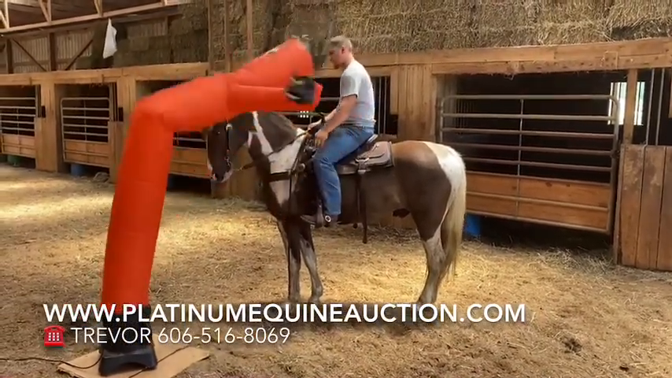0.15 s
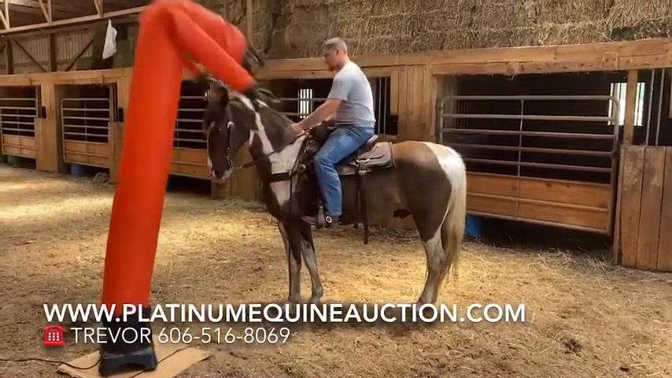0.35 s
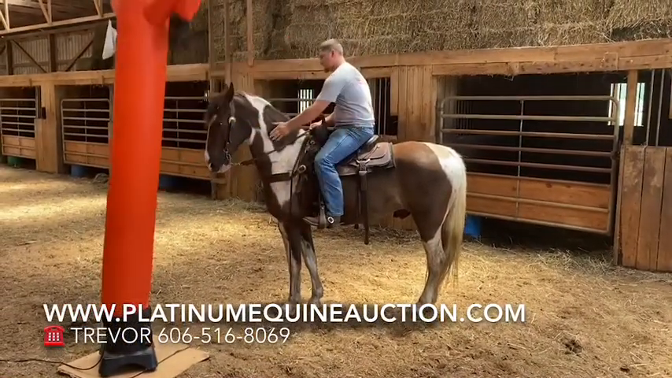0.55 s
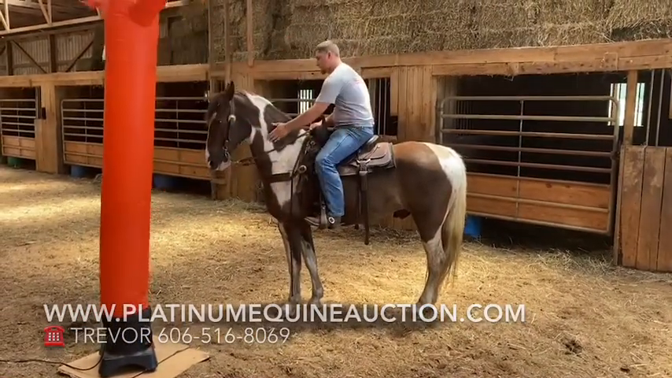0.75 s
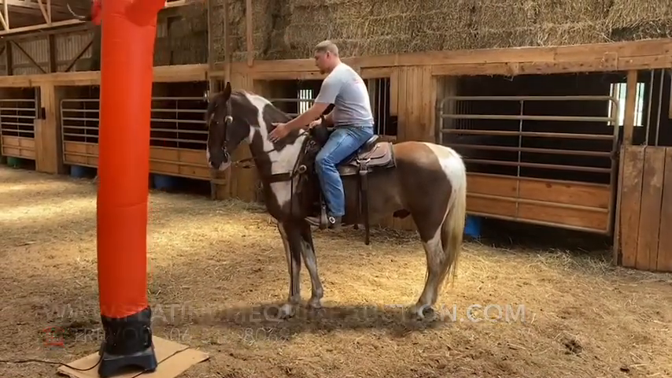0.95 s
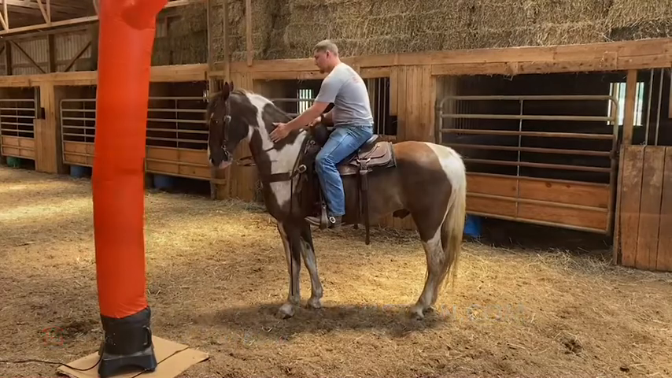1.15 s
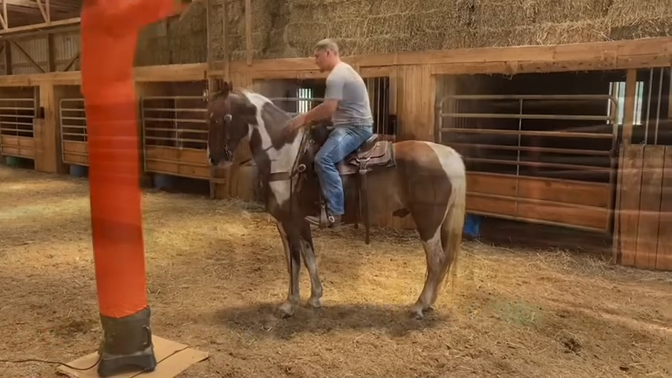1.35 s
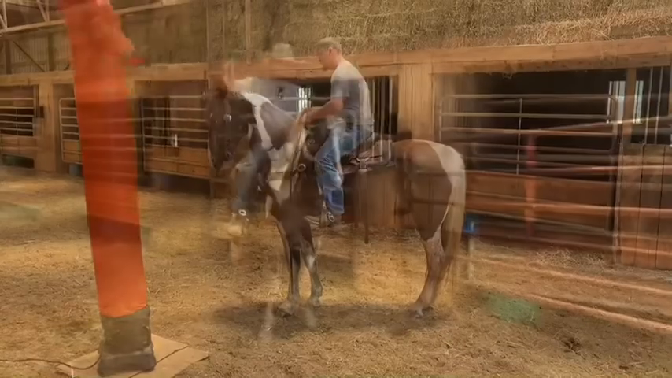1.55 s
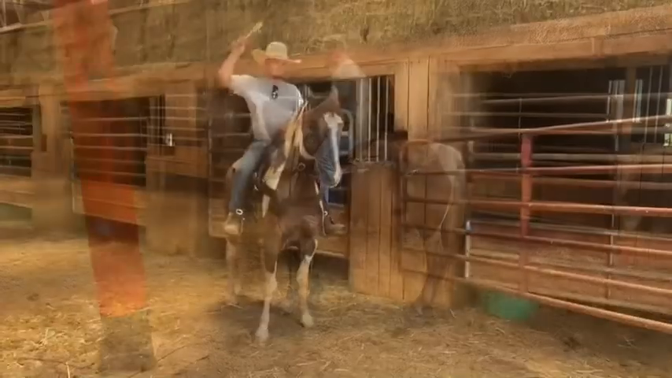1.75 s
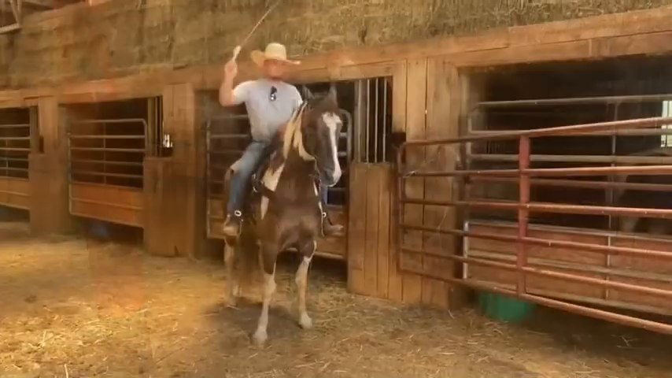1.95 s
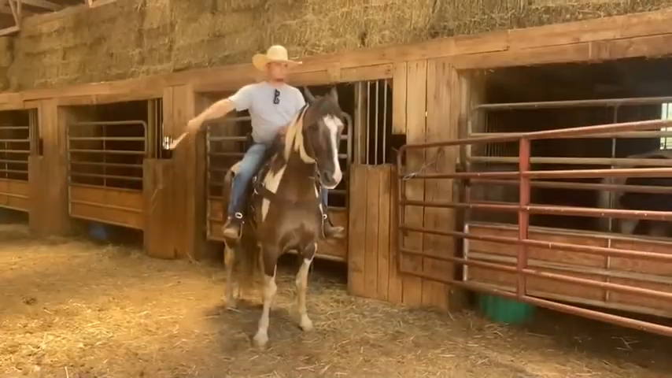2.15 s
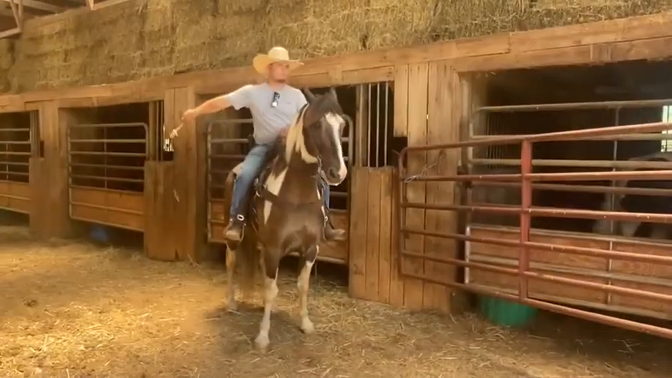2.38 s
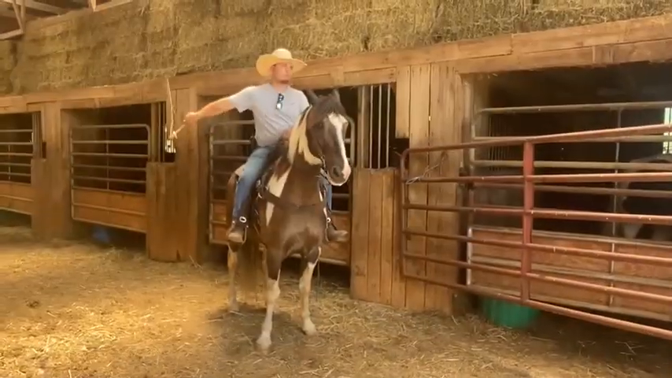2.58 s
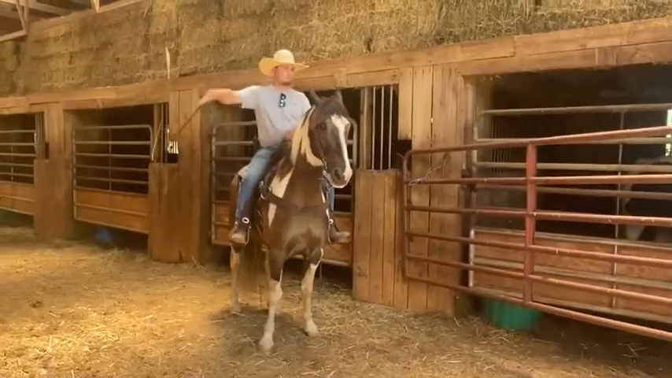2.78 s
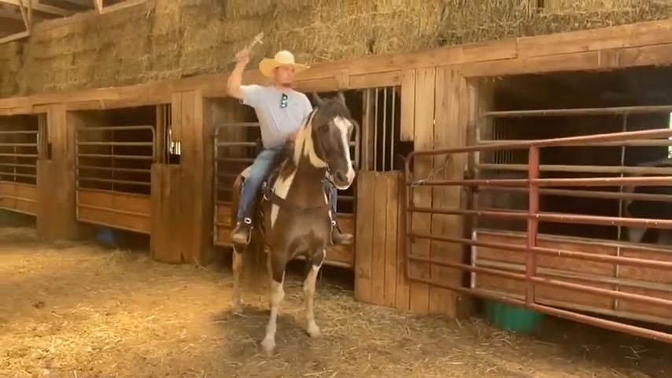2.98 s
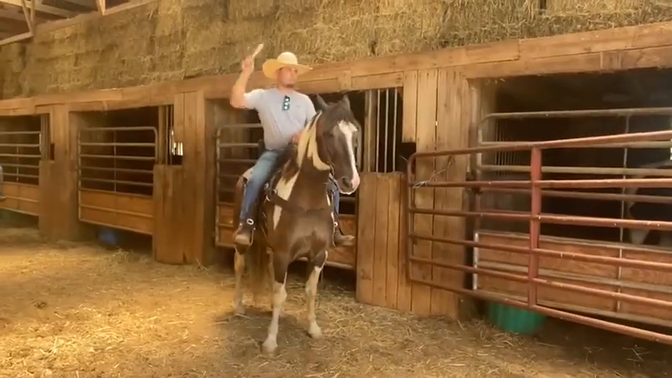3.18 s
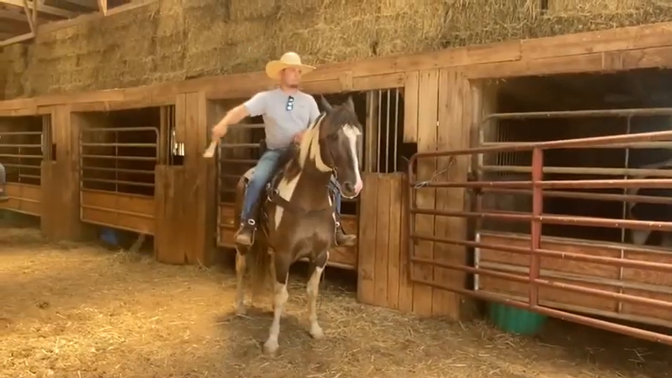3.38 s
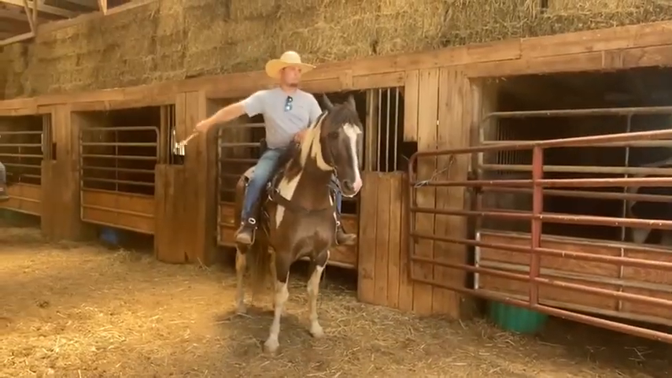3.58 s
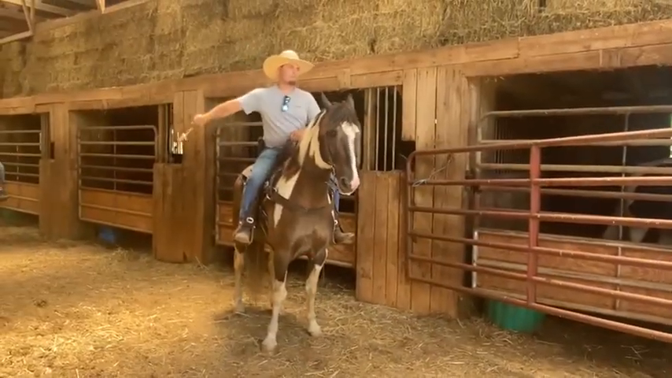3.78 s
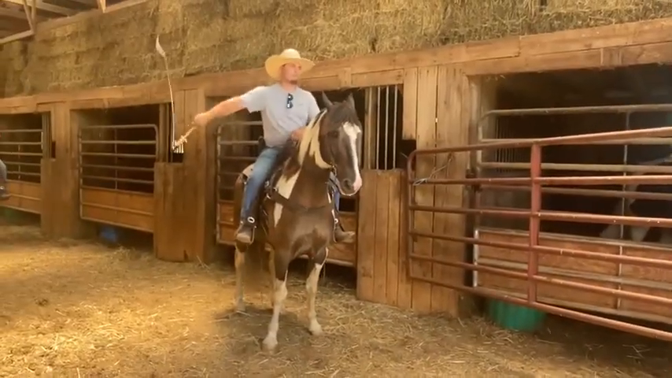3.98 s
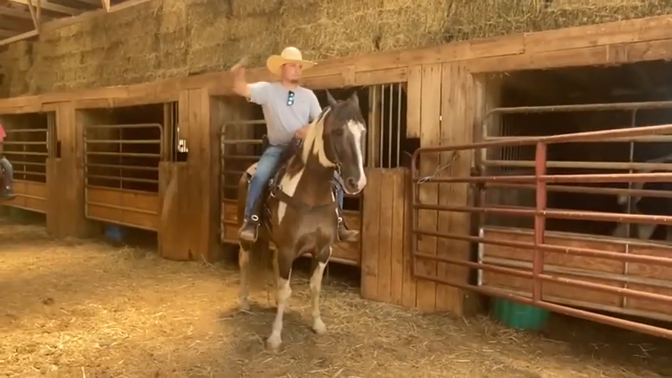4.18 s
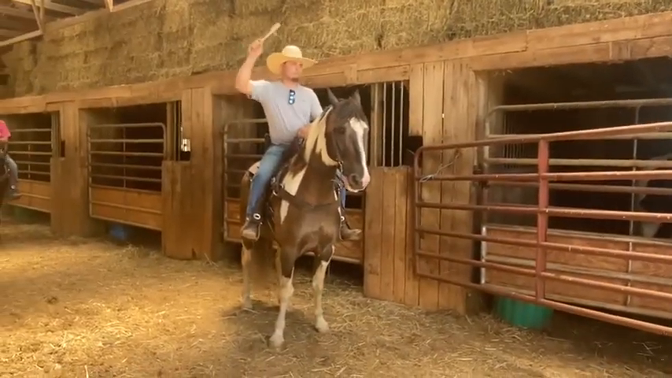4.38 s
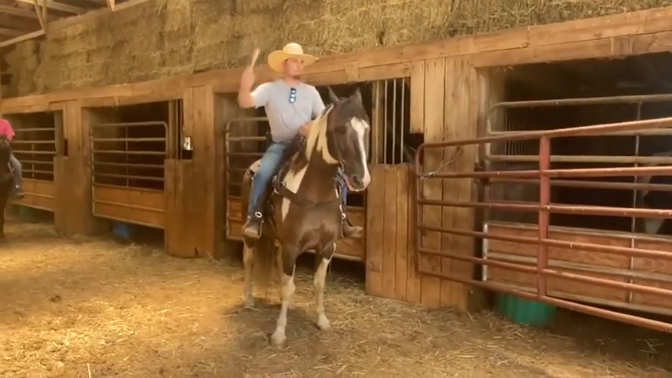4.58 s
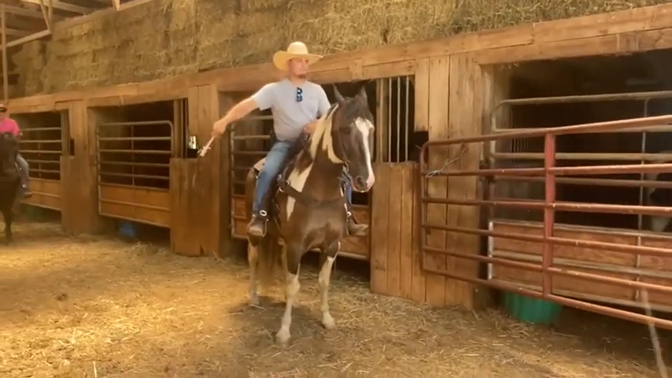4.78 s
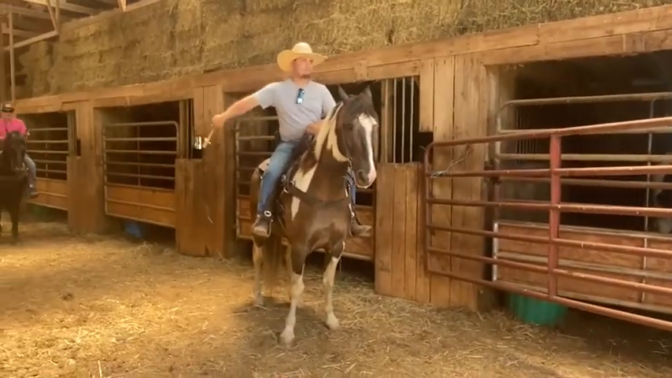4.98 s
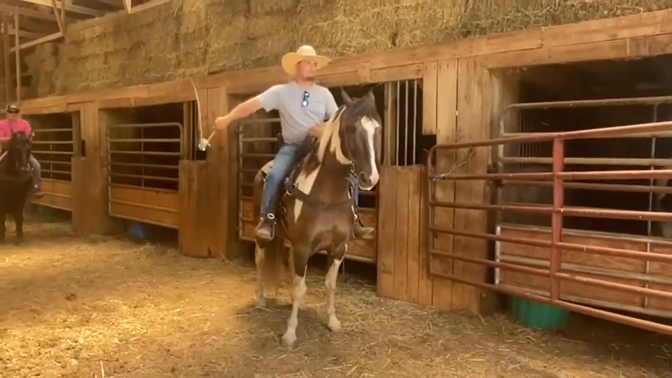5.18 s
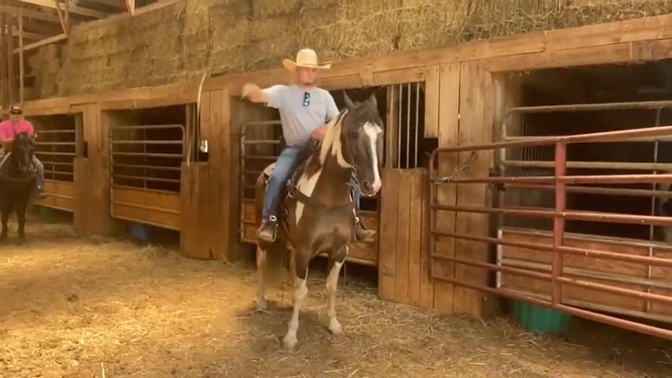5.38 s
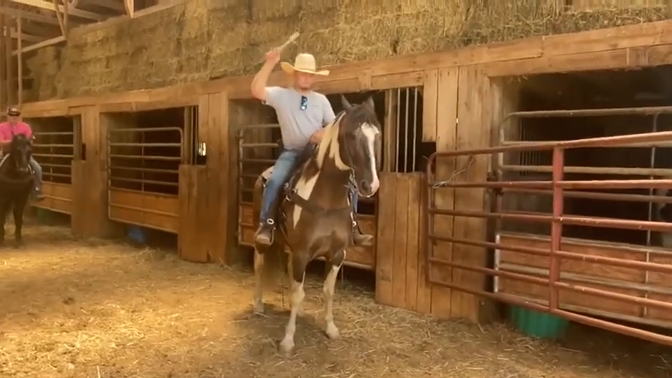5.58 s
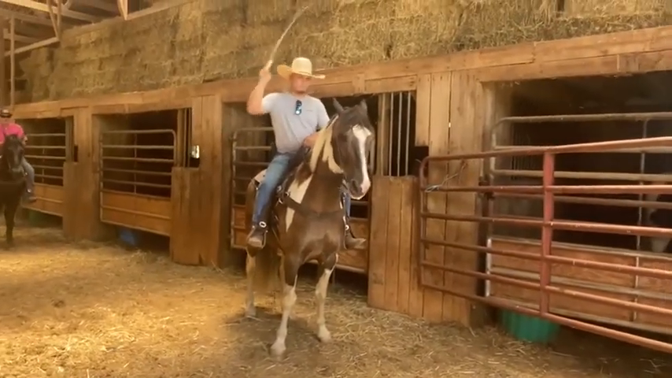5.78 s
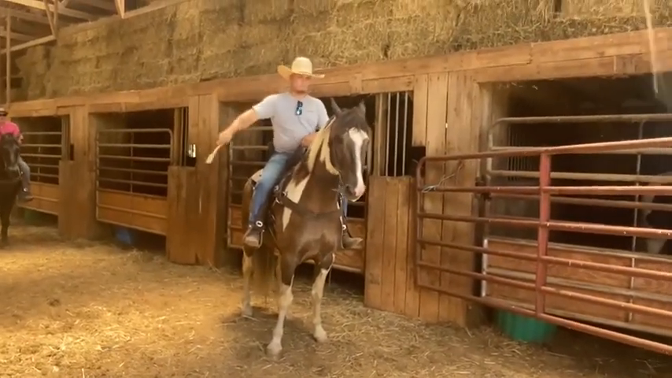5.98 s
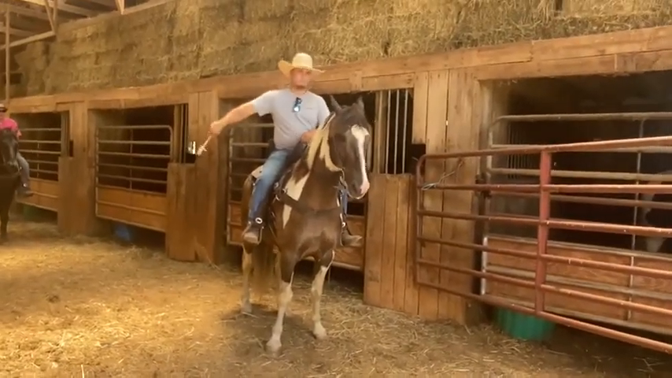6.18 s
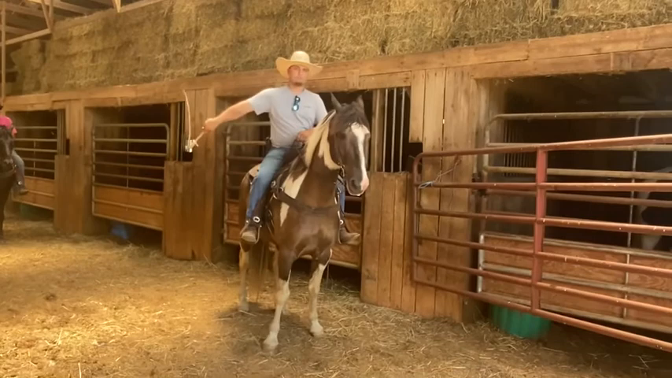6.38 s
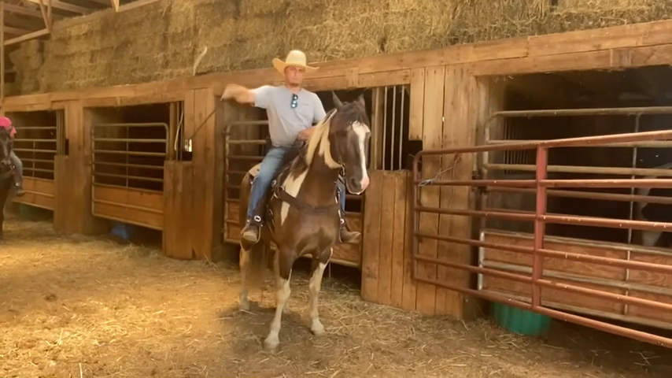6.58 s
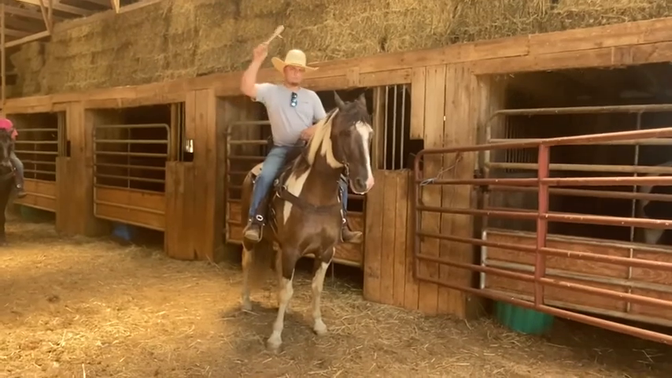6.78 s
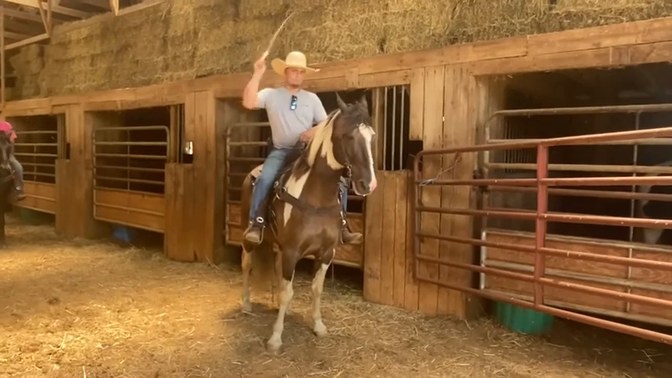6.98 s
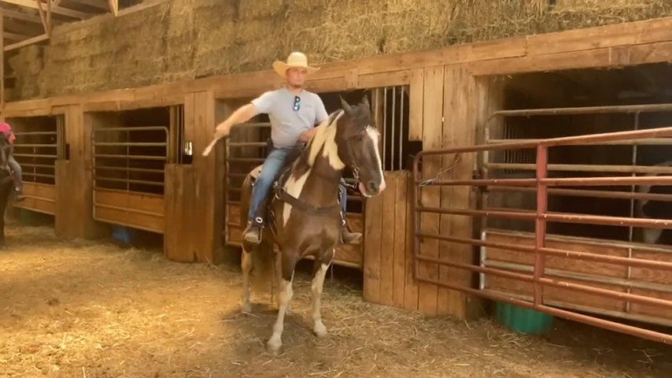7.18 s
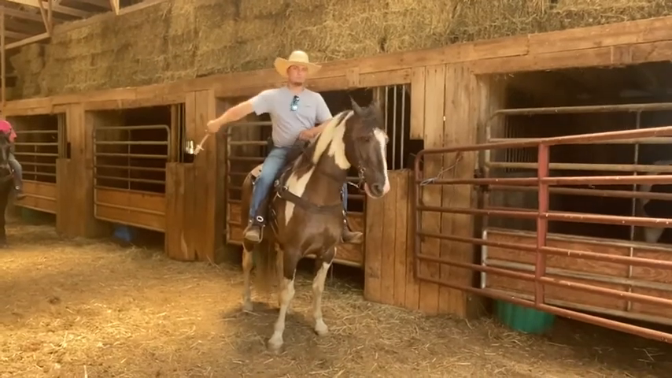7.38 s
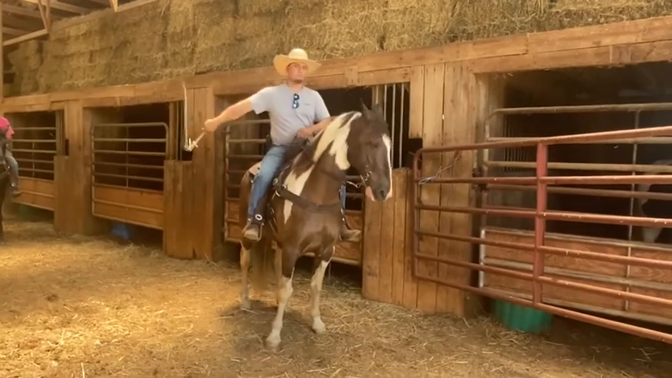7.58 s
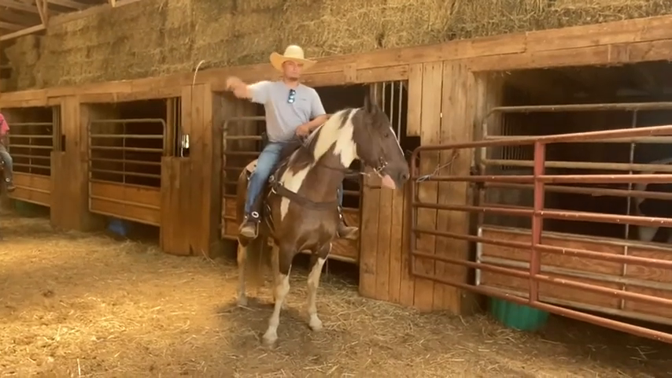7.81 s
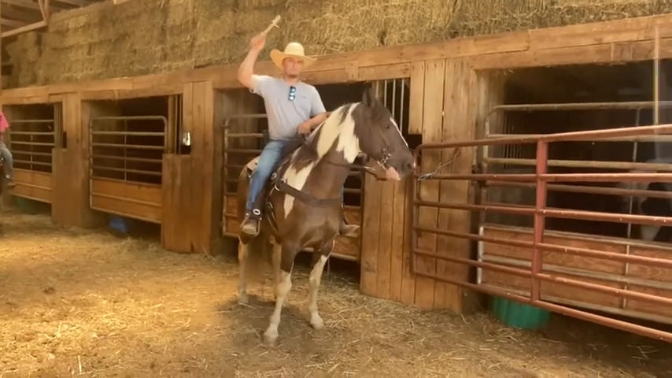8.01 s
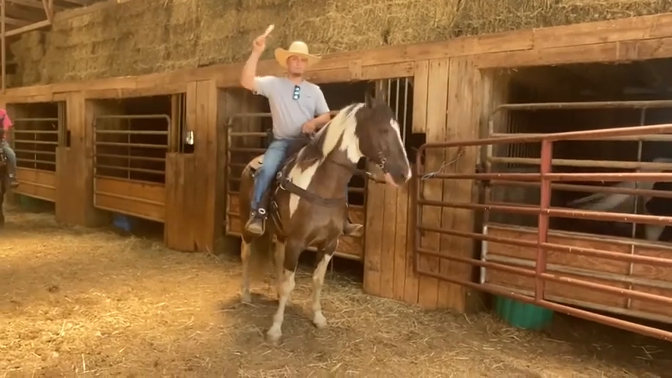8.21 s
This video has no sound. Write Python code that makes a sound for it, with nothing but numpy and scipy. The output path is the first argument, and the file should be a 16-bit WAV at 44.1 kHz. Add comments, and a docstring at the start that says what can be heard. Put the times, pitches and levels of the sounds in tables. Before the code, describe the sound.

A blower rushes through a flapping fabric tube and dies away, then five sharp whip cracks ring and slap back through a long timber barn.

```python
"""A long timber barn, heard by a microphone pair: a blower rushes through a flapping fabric tube and fades,
then a rider cracks a whip five times. Each crack is a shock wave with scattered grains of noise, returned by
floor, stalls and roof, then by the far end walls, over a dying wash of noise that decays band by band.
Between cracks the thong swishes in sliding bands of noise, sparrows chirp in gliding sines, tack ticks in
short resonant clicks, and a breeze rumbles and knocks on the microphone in low noise and soft pushes."""
import sys
import numpy as np
from scipy import signal
from scipy.fft import rfft, irfft, next_fast_len
from scipy.io import wavfile
from scipy.ndimage import map_coordinates

SR = 44100
rng = np.random.default_rng(int(sys.argv[2]) if len(sys.argv) > 2 else 0)


def put_to_file(sound):
    """Save the sound as 16-bit audio at rate SR, in the file named by the first command-line argument."""
    columns = np.atleast_2d(sound).T  # one column per channel
    safe = np.clip(columns, -1, 1)
    whole_steps = np.round(safe * 32767)
    wavfile.write(sys.argv[1], SR, whole_steps.astype(np.int16))


def invert_db(level):
    """Linear amplitude ratio for a level in decibels (20 dB per decade), elementwise."""
    return 10 ** (np.asarray(level, dtype=float) / 20)


N = 363825
T = np.arange(N) / SR   # seconds

# Blower running down. Each row: time in seconds, rush level in dB, tube boom in dB against the rush.
BLOWER_RUN = [(0.0, -22.5, -12), (0.29, -24, -3), (0.39, -22, -15.5), (1.0, -24, -12), (1.4, -27.5, -10),
              (1.7, -34, -14), (1.89, -42.5, -12.5), (1.99, -63.5, -6)]
# Tone of the rush as heard, the middle with narrow gaps near 9.2 and 13.1 kHz, then the sides.
# Each row: frequency in Hz, relative density in dB.
RUSH_MID_TONE = [(200, -8.5), (300, 1), (500, -7.5), (790, 1), (1300, -7), (1660, -8), (1740, -18),
                 (2000, -18.5), (2570, -20.5), (4000, -23.5), (6820, -25), (8400, -36.5), (9220, -49.5),
                 (10200, -34.5), (12300, -39), (13100, -73.5), (14100, -40), (16000, -51.5)]
RUSH_SIDE_TONE = [(24, -58.5), (40, -43), (392, -15), (444, -11.5), (790, -8), (1850, -14), (5440, -37),
                  (7170, -37), (8990, -33.5), (13400, -42), (16000, -87)]
# Resonances of the air column in the tube. Each row: frequency in Hz, width in Hz, added level in dB.
TUBE_MODES = [(215, 40, 9.5), (304.6, 28, -0.6), (389.3, 11, 4), (800, 190, -7.5), (1226, 160, -2.1),
              (2720, 840, 4.5)]
# Tone of the still barn air. Each row: frequency in Hz, relative density in dB.
AIR_TONE = [(180, -37.5), (300, 2), (584, -10.5), (1120, -8), (2360, -14.5), (3460, -8.5), (4440, -10),
            (5610, -18), (9390, -32.5), (12100, -27), (16000, -49.5)]
# Fabric snaps taut. Each row: time in seconds, peak in dB.
FABRIC_SNAPS = [(0.224, -14.5), (0.264, -25), (0.41, -33.5), (0.466, -28)]
# Whip cracks. Each row: time in seconds, shock level in dB, end-wall return level in dB, thud peak in dB,
# level in dB that the swish of the forward throw reaches.
WHIP_CRACKS = [(2.0774, -4.5, -2.5, -21, -52.5), (3.3668, -3, 2, -23, -56.5),
               (4.640, -1.5, 0.5, -24.5, -58.5), (5.8817, -0.5, 1.5, -17, -56.5),
               (7.0834, -2, 2, -26.5, -54)]
# The thong turns behind the rider. Each row: time in seconds, flick of the tip in dB, swish in dB.
THONG_TURNS = [(2.8344, -60, -56.5), (4.123, -67.5, -57), (5.3734, -63.5, -54), (6.5944, -61, -54),
               (7.8176, -62.5, -57)]
# Breeze on the microphone. Each row: time in seconds, rumble level in dB.
BREEZE_RUMBLE = [(1.95, -61), (2.34, -61.5), (2.65, -53), (2.97, -69), (3.25, -72.5), (3.44, -64.5),
                 (3.65, -63.5), (3.93, -73), (4.97, -60), (5.05, -59), (5.39, -63.5), (5.67, -66),
                 (5.97, -62), (6.2, -66.5), (6.76, -62), (7.83, -54), (8.0, -42), (8.25, -51.5)]
# Nearer sparrows, chirps that slide.
# Each row: start in seconds, length in seconds, first pitch in Hz, last pitch in Hz, level in dB.
SLIDING_CHIRPS = [(2.705, 0.023, 4616, 3600, -64), (3.23, .04, 5520, 4910, -71),
                  (3.3, 0.016, 5200, 3970, -59), (4.198, .043, 3644, 4184, -68.5),
                  (5.14, .031, 5195, 5000, -59), (5.19, .04, 3600, 3950, -64),
                  (5.277, .069, 4930, 4770, -56), (5.324, 0.052, 4200, 4210, -57),
                  (5.674, .06, 4600, 3060, -62.5), (5.739, .045, 3095, 2600, -69),
                  (6.925, 0.094, 4700, 5190, -72)]
# Chirps that rise and fall back.
# Each row: start in seconds, length in seconds, foot pitch in Hz, top pitch in Hz, level in dB.
ARCHED_CHIRPS = [(3.225, 0.07, 3510, 4160, -73), (4.284, .025, 4130, 4560, -60),
                 (4.372, .038, 3800, 5250, -61), (4.429, .042, 3550, 4550, -57.5),
                 (4.479, .031, 4090, 4710, -66.5), (6.845, .019, 4100, 4715, -65.5),
                 (7.001, 0.046, 3650, 4630, -63.5)]
# Tone of the reverberation as heard, the middle with a narrow gap near 9 kHz, then the sides.
# Each row: frequency in Hz, relative density in dB.
WASH_MID_TONE = [(60, -38.5), (100, -12), (550, -9), (1520, -5.5), (3000, -1), (4300, -1), (6420, -6),
                 (8200, -19.5), (9000, -36), (10000, -19), (13800, -26), (14700, -33.5), (16000, -89.5)]
WASH_SIDE_TONE = [(60, -44.5), (100, -22), (500, -5.5), (910, -5.5), (3470, 0), (6500, -7), (9820, -15),
                  (11400, -22.5), (13800, -29.5), (16000, -57.5)]
# Decay of the barn. Each row: band in Hz, early t60 in seconds, late t60 in seconds, late start in dB.
BARN_DECAY = [(120, 0.23, 1.9, -15), (380, 0.1, 1.5, -16.5), (626, 0.17, 0.86, -26.5), (855, 0.28, 1, -17),
              (2720, 0.18, 1.034, -20), (5000, 0.24, .75, -19), (7800, 0.23, 1.1, -21),
              (10400, 0.41, 0.55, -23.5), (14000, 0.54, .3, -21)]
# Steel gate set humming by each crack. Each row: pitch in Hz, level in dB against the wash, t60 in seconds.
GATE_MODES = [(339, -30.5, 0.98)]
# Surfaces close to the rider. Each row: delay in seconds, left dB, right dB, smear in ms, top in Hz;
# both levels are against the shock.
NEAR_SURFACES = [(0, -5, -9.5, .3, 13070), (.002, 0.5, -2, 1.1, 6620), (.0034, -1.5, -10, 0.35, 830),
                 (.0052, -10, -5.5, 0.34, 3333), (.011, -18, -8.5, 0.22, 6970),
                 (0.0132, -4, -3, 0.29, 12000), (0.0155, -4.5, -4, .51, 8400),
                 (.0185, -3.5, -11.5, 0.13, 15000), (.0223, -9, -1.5, 0.085, 14000),
                 (.026, -8.5, -14, 0.33, 6034), (.041, -18.5, -12, 0.72, 2578),
                 (.059, -18, -14.5, 0.43, 2915)]
# Surfaces down the aisle. Each row: first delay in seconds, left dB, right dB, first smear in ms,
# loss in dB per round trip; both levels are against the end-wall return.
FAR_SURFACES = [(.169, -57.5, -43, 0.74, 10), (0.197, -31.5, -40, 0.8, 19), (.2328, -7, -12.5, 0.25, 18.5),
                (0.278, -45, -37, 1.6, 13), (.433, -39, -38.5, 0.93, 13), (.667, -49.5, -60.5, 1.8, 7)]
# Tone of the near and far returns. Each row: frequency in Hz, gain in dB before a common lift.
SHOCK_TONE = [(120, -32.5), (200, -8.5), (1000, -5.5), (1500, -2.5), (2610, 0.5), (5730, -4.5),
              (7270, -10.5), (9400, -15.5), (12200, -28.5), (14600, -31), (16000, -38.5)]
# Arrival of the low push at the left, then the right microphone, in seconds after the crack.
PUSH_DELAYS = (0.0038, .0042)
# Short low-mid ring behind the shock: pitch in Hz, dB against the shock, t60 in seconds, left-right dB.
SHOCK_RING = (1400, -5, .013, 5)
# Boom of the end wall: pitch in Hz, dB against the end-wall return, t60 in seconds.
WALL_BOOM = (300, -38, .03)
# Gusts that knock the ports. Each row: time in seconds, level in dB before filtering, pitch in Hz.
PORT_KNOCKS = [(2.669, -51.5, 62.4), (2.759, -44.5, 170), (5.204, -56.5, 79), (5.774, -52, 118),
               (6.979, -42, 135), (7.789, -50, 61.2), (7.968, -43.5, 70.4), (8.043, -26.5, 71.2),
               (8.06, -31, 65.4), (8.093, -35.5, 65.6)]
# Tack. Each row: time in seconds, peak in dB at mid-pan, pitch in Hz, left-right dB.
TACK_TICKS = [(4.2433, -37.5, 4930, -5), (4.2554, -48.5, 5000, 1.5), (4.5855, -45.5, 6500, 1.3),
              (5.4924, -58.5, 3790, 1.5), (5.7568, -51.5, 6600, 5), (6.7531, -49.5, 4970, 2),
              (6.7694, -60, 3040, 0.1)]

AISLE_TRIP_S = .2224   # one round trip of the aisle
END_WALL_S = FAR_SURFACES[2][0]   # delay of the wall that faces the aisle


def rms_one(x):
    """Scale to rms 1."""
    return x / np.sqrt(np.mean(x ** 2) + 1e-20)


def in_time(rows, outside_db=-140):
    """Columns as sample curves; the first level is silent outside the table."""
    s, level, *more = np.transpose(rows)
    return [np.interp(T, s, level, outside_db, outside_db)] + [np.interp(T, s, c) for c in more]


def at_hz(points, hz, axis=1):
    """Read a table on a log-frequency axis."""
    p = np.array(points)
    return np.interp(np.log(hz + 1), np.log(p[:, 0] + 1), p[:, axis])


def colour(x, spectrum):
    """Filter by an outline of Hz and dB."""
    size = next_fast_len(x.shape[-1])
    gain = invert_db(at_hz(spectrum, np.arange(size // 2 + 1) * SR / size))
    return irfft(rfft(x, size) * gain, size)[..., :x.shape[-1]]


def band(x, low_hz, high_hz):
    """Band-pass."""
    edges = [low_hz, min(high_hz, .45 * SR)]
    return signal.sosfilt(signal.butter(2, edges, "band", fs=SR, output="sos"), x)


def drift(rate, size=N):
    """Smooth random wander through 2 * rate normal draws (spread 1) per second."""
    steps = rng.standard_normal(int(size / SR * rate * 2) + 3)
    return map_coordinates(steps, [np.arange(size) / SR * rate * 2], order=3)


def resonance(x, hz, width):
    """Two-pole peak of gain about 1, width in Hz."""
    r = np.exp(-np.pi * width / SR)
    feedback = [1, -2 * r * np.cos(2 * np.pi * hz / SR), r * r]
    return signal.lfilter(np.array([1, 0, -1]) * (1 - r * r) / 2, feedback, x)


def left_right(mid, side):
    """Middle and sides to two channels."""
    return np.array([mid + side, mid - side])


def add(out, sound, s):
    """Mix a short sound in, centred on time s."""
    i = round(s * SR) - sound.shape[-1] // 2
    n = min(sound.shape[-1], N - i)
    if n > 0:
        out[..., i:i + n] += sound[..., :n]


def puff(smear_ms, top_hz, alike=0.52, lag_ms=0):
    """One scattered arrival: a spiky stereo noise grain of peak 1 with a dull top, its left late by lag_ms."""
    ms = np.arange(-400, 400) / SR * 1000
    shared, left, right = rng.standard_normal((3, len(ms)))
    grain = alike * shared + (1 - alike) * np.array([left, right])
    grain = grain * np.exp(-abs(ms) / smear_ms)
    grain = signal.sosfilt(signal.butter(2, min(top_hz, .45 * SR), fs=SR, output="sos"), grain)
    grain[0] = np.roll(grain[0], round(lag_ms * SR / 1000))
    return grain / abs(grain).max(axis=1, keepdims=True)


def thud(hz, t60):
    """A soft push: a decaying sine of peak 1, centred on its start."""
    t = np.maximum(np.arange(-4000, 4000) / SR, 0)
    push = np.sin(2 * np.pi * hz * t) * invert_db(-60 * t / t60) * (1 - np.exp(-t / .002))
    return push / abs(push).max()


def blower(side_db=-6.5, patchy_db=0.76, boom_patchy_db=2.1):
    """Turbulent rush, lifted at the resonances of the tube; the bass lumps on its own."""
    n = round(BLOWER_RUN[-1][0] * SR)
    rush_db, boom_db = [c[:n] for c in in_time(BLOWER_RUN)]
    white = rng.standard_normal((2, n))
    white = white + sum(invert_db(db) * resonance(white, hz, width) for hz, width, db in TUBE_MODES)
    mid = rms_one(colour(white[0], RUSH_MID_TONE))
    side = invert_db(side_db) * rms_one(colour(white[1], RUSH_SIDE_TONE))
    air = left_right(mid, side)
    boom = rms_one(colour(air, [(45, -20.5), (55, -1.0), (170, -4.0), (240, -41)]))
    rush = invert_db(patchy_db * (drift(14, n) + drift(3.1, n))) * colour(air, [(150, -39.5), (210, -1.5)])
    out = np.zeros((2, N))
    out[:, :n] = invert_db(rush_db) * (rush + invert_db(boom_db + boom_patchy_db * drift(18, n)) * boom)
    return out


def still_air(air_db=-71.5, uneven_db=1.7):
    """The still air of the barn: a faint, slowly wandering bed of noise."""
    noise = rms_one(colour(rng.standard_normal((2, N)), AIR_TONE))
    return invert_db(air_db + uneven_db * (drift(1.3) + drift(6))) * noise


def flaps():
    """Fabric snapping taut pushes the air column, alike at both microphones."""
    out = np.zeros(N)
    for s, db in FABRIC_SNAPS:
        add(out, invert_db(db) * thud(95, .09), s)
    return out


def swish(width_hz=200, octave_db=-9):
    """Vortices shed by the thong: noise around a centre that follows its speed, with a lift an octave over."""
    centres = np.geomspace(700, 1200, 5)   # Hz
    bank = []
    for hz in centres:
        shedding = band(resonance(rng.standard_normal((2, N)), hz, width_hz), 0.6 * hz, 2.9 * hz)
        octave = resonance(rng.standard_normal((2, N)), 2 * hz, 3.5 * width_hz)
        bank.append(rms_one(shedding) + invert_db(octave_db) * rms_one(octave))
    # the thong speeds up into the crack: louder, higher (s, dB, Hz)
    strokes = [[(s - 0.14, db - 16, 700), (s, db, 1010)] for s, *_, db in WHIP_CRACKS]
    # and slows after the turn: softer, lower
    strokes += [[(s - .015, db - 11, 970), (s + .015, db, 970), (s + 0.18, db - 22.5, 790)]
                for s, _, db in THONG_TURNS]
    out = np.zeros((2, N))
    for stroke in strokes:
        db, hz = in_time(stroke)
        on = db > -139
        shares = np.exp(-(np.log(hz[on] / centres[:, None]) / .14) ** 2)
        shares /= np.sqrt((shares ** 2).sum(axis=0))   # even power between centres
        out[:, on] += invert_db(db[on]) * sum(share * noise[:, on] for share, noise in zip(shares, bank))
    return out


def breeze(lumpy_db=5, flutter_db=-11.0):
    """Lumpy low noise on the microphone ports, with a higher flutter riding on it."""
    rumble_db, = in_time(BREEZE_RUMBLE)
    shared, left, right = rng.standard_normal((3, N))
    ports = shared + 0.94 * np.array([left, right])
    gust_db = rumble_db + lumpy_db * drift(16.0)
    rumble = invert_db(gust_db) * rms_one(band(band(ports, 50, 98), 45, 190))
    flutter = invert_db(gust_db + flutter_db) * rms_one(band(band(ports, 160, 290), 120, 380))
    return rumble + flutter


def sparrows(far_db=-77, flock_arch_hz=500, wet_db=-7):
    """Husky near-sines that slide or arch, blurred by the roof; a farther flock twitters at random."""
    calls = [(s, length, first, last, 0, db) for s, length, first, last, db in SLIDING_CHIRPS]
    calls += [(s, length, foot, foot, top - foot, db) for s, length, foot, top, db in ARCHED_CHIRPS]
    calls += [(2 + 6.2 * a, .02 + .03 * b, 3300 + 1500 * c, 3000 + 1500 * d, flock_arch_hz, far_db + 6 * e)
              for a, b, c, d, e in rng.random((70, 5))]
    out = np.zeros(N)
    for start, length, first_hz, last_hz, arch_hz, db in calls:
        on = slice(round(start * SR), min(round((start + length) * SR), N))
        u = np.clip((T[on] - start) / length, 0, 1)
        pitch = first_hz + (last_hz - first_hz) * u + arch_hz * np.sin(np.pi * u)
        swell = np.minimum(1, 4 * np.sin(np.pi * u))
        out[on] += invert_db(db) * swell * np.sin(2 * np.pi * np.cumsum(pitch) / SR)
    out *= 1 + .5 * drift(120)   # husky
    tail = rng.standard_normal(6000) * invert_db(-60 * np.arange(6000) / SR / .35)
    out = out + invert_db(wet_db) * signal.fftconvolve(out, tail / np.linalg.norm(tail))[:N]
    # the right microphone hears them softer and 14 samples later; each has its own single echo
    left = out + .15 * np.roll(out, 500)
    right = .8 * np.roll(out, 14) + .15 * np.roll(out, 700)
    return np.array([left, right])


def wash_start_db(shock_db):
    """Reverberation follows only part of the shock's level."""
    return -15 + 0.37 * shock_db


def wash(uneven_db=3.2, hiss_slope_db_per_ms=1.7, hiss_db=-5, hiss_pan_db=8):
    """Dense reverberation, an early and a late decay per band; a short dull hiss is heard around each crack."""
    white = rng.standard_normal((2, N))
    mid = rms_one(colour(white[0], WASH_MID_TONE))
    side = invert_db(-0.5) * rms_one(colour(white[1], WASH_SIDE_TONE))
    noise = left_right(mid, side) * invert_db([[1.5], [-.5]])   # leans left
    cracks = [(s, wash_start_db(db)) for s, db, *_ in WHIP_CRACKS]
    # the wall returns reverberate too, duller
    walls = [(s + END_WALL_S, far_db - 42) for s, _, far_db, *_ in WHIP_CRACKS]
    walls += [(s + 2 * AISLE_TRIP_S, far_db - 58) for s, _, far_db, *_ in WHIP_CRACKS]
    size = next_fast_len(N)
    bins = rfft(noise, size)
    log_hz = np.log(np.arange(size // 2 + 1) * SR / size + 1)
    log_bands = np.log(np.array(BARN_DECAY)[:, 0])
    coarse, out = T[::32], np.zeros((2, N))
    for k, (hz, early, late, late_db) in enumerate(BARN_DECAY):
        # bands overlap and add up flat
        share = np.interp(log_hz, log_bands, np.arange(len(BARN_DECAY)) == k)
        power = 0
        for s, db in cracks + [(s, db - 5.9 * (hz / 10000) ** 2) for s, db in walls]:
            t = np.maximum(coarse - s, 0)
            build = 1 - np.exp(-(t / .017) ** 3.5)   # nothing dense returns before the roof does
            early_power = invert_db(db - 60 * t / early) ** 2
            late_power = invert_db(db + late_db - 60 * t / late) ** 2
            power = power + build * (early_power + late_power)
        uneven = invert_db(uneven_db * np.array([drift(110), drift(110)]))
        out += np.interp(T, coarse, np.sqrt(power)) * uneven * irfft(bins * share, size)[:, :N]
    dull = band(noise, 430, 5400)
    for s, db in cracks:
        # the hiss falls off alike before and after the crack, stronger on the left
        level = invert_db(db + hiss_db - hiss_slope_db_per_ms * 1000 * abs(T - s))
        out += dull * level * invert_db([[0], [-hiss_pan_db]])
    return out


def n_wave(length_ms=0.14):
    """The tip passes the speed of sound: a jump up, a ramp down, a jump back."""
    ms = np.arange(-400, 400) / SR * 1000
    return -2 * ms / length_ms * (abs(ms) <= length_ms / 2)


def far_returns(last_s=.9, smear_ms_per_trip=0.67, late_smear_ms=0.84):
    """Each far surface repeats once a round trip, weaker and more smeared; rows as for the near surfaces."""
    rows = []
    for first_s, left_db, right_db, smear, loss_db in FAR_SURFACES:
        for k in range(int((last_s - first_s) / AISLE_TRIP_S) + 1):
            delay = first_s + k * AISLE_TRIP_S
            late = delay > 2.1 * AISLE_TRIP_S   # from beyond two trips: more blurred
            top_hz = 2800 if late or k else 5300   # late or repeated returns are duller
            rows.append((delay, left_db - k * loss_db, right_db - k * loss_db,
                         smear + k * smear_ms_per_trip + late * late_smear_ms, top_hz))
    return rows


def add_return(bus, db, surface, s, lag_ms=0, skirt=False):
    """One surface scatters the crack, a little different each time; rough planks add a wider, fainter skirt."""
    delay, left_db, right_db, smear, top_hz = surface
    gain = invert_db(db + np.array([[left_db], [right_db]]) + rng.normal(0, 1.8))
    add(bus, gain * puff(smear, top_hz, lag_ms=lag_ms), s + delay)
    if skirt:
        add(bus, gain * invert_db(-19) * puff(2.6, top_hz, lag_ms=lag_ms), s + delay)


def shocks(direct_db=3, push_hz=119, bounce=0.29):
    """The tip's shock front, its separate near and far returns, a low push, a ring and the end wall's boom."""
    near, far = np.zeros((2, N)), np.zeros((2, N))
    uncoloured = np.zeros((2, N))   # direct shock, push, ring and boom
    ring_hz, ring_db, ring_t60, ring_pan_db = SHOCK_RING
    boom_hz, boom_db, boom_t60 = WALL_BOOM
    for s, near_db, far_db, thud_db, _ in WHIP_CRACKS:
        front = band(band(n_wave(), 400, 12000), 200, 13000)
        add(uncoloured, invert_db(near_db + direct_db) * front, s)
        for surface in NEAR_SURFACES:
            add_return(near, near_db, surface, s)
        for surface in far_returns():
            add_return(far, far_db, surface, s, lag_ms=.36, skirt=True)
        for side, delay in zip(uncoloured, PUSH_DELAYS):
            add(side, invert_db(thud_db) * thud(push_hz, .06), s + delay)
        ring_gain = invert_db(near_db + ring_db - np.array([[0], [ring_pan_db]]))
        add(uncoloured, ring_gain * thud(ring_hz, ring_t60), s + .0004)
        add(uncoloured, invert_db(far_db + boom_db) * thud(boom_hz, boom_t60), s + END_WALL_S)
    slats = band(band(far, 750, 14000), 800, 16000)   # slatted walls let the bass through
    slats = slats + bounce * np.roll(slats, round(.0007 * SR), axis=1)   # a floor bounce combs each return
    return invert_db(4) * colour(near + slats, SHOCK_TONE) + uncoloured


def gate_hum():
    """Each crack sets the steel gate humming: a decaying sine."""
    out = np.zeros(N)
    for s, shock_db, *_ in WHIP_CRACKS:
        t = np.maximum(T - s, 0)
        for hz, gate_db, t60 in GATE_MODES:
            level = invert_db(wash_start_db(shock_db) + gate_db - 60 * t / t60)
            out += level * np.sin(2 * np.pi * hz * t)
    return out


def knocks(crunch_db=-19, crunch_s=.04):
    """Gusts knock the microphone ports: a low push under a muffled, hollow swell of noise."""
    out = np.zeros((2, N))
    swell = np.exp(-((np.arange(4000) - 2000) / SR / crunch_s * 2) ** 2)
    for s, db, hz in PORT_KNOCKS:
        add(out, invert_db(db) * thud(hz, 0.1), s)
        noise = rng.standard_normal(4000)
        crunch = rms_one(band(noise, 100, 410)) + 0.72 * rms_one(resonance(noise, 394, 22))
        add(out, invert_db(db + crunch_db) * crunch * swell, s + 0.0081)
    return band(band(out, 35, 700), 30, 900)


def flicks():
    """An airy burst of hiss as the tip turns on the back throw."""
    hiss, level = rms_one(band(rng.standard_normal((2, N)), 1500, 12000)), 0
    for s, db, _ in THONG_TURNS:
        t = np.maximum(T - s, 0)
        level = level + invert_db(db - 60 * t / 0.09) * np.minimum(1, t / .006)
    return level * hiss


def ticks():
    """Buckles and leather click: a grain of noise through a broad resonance."""
    out = np.zeros((2, N))
    for s, db, hz, pan_db in TACK_TICKS:
        click = resonance(puff(0.95, 12000), hz, 2500)
        add(out, invert_db(db + np.array([[.5], [-.5]]) * pan_db) * click / abs(click).max(), s + 0.0015)
    return out


def scene():
    """All sources at the microphone pair."""
    blower_and_air = blower() + still_air() + flaps()
    whip = swish() + wash() + shocks() + gate_hum() + flicks()
    return blower_and_air + whip + breeze() + sparrows() + knocks() + ticks()


def low_pass(x):
    """Removes everything above the highest recorded frequency."""
    return signal.sosfilt(signal.butter(12, 16470, fs=SR, output="sos"), x)


def record(dry):
    """The loudest peaks are rounded off."""
    mix = 0.87 * np.tanh(dry / 0.96)
    return low_pass(mix)


dry = scene()
out = record(dry)
put_to_file(out)
```